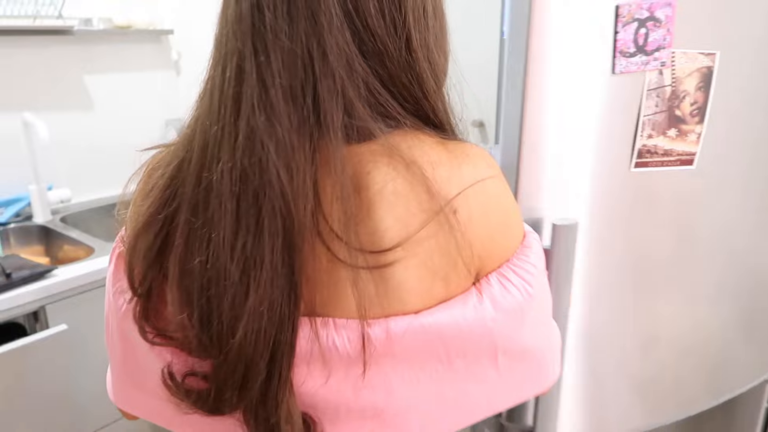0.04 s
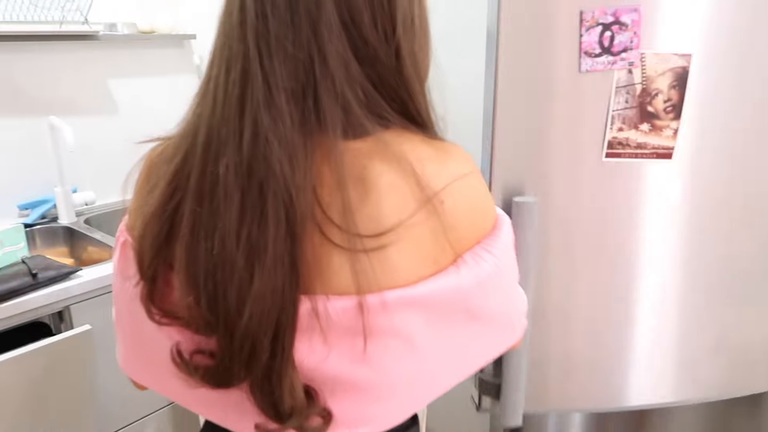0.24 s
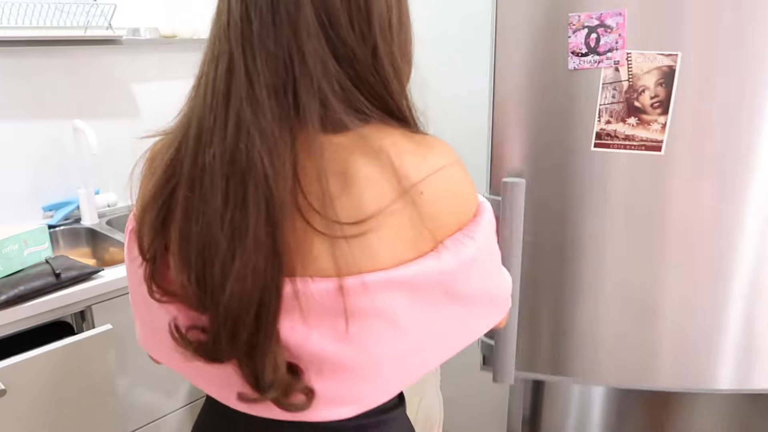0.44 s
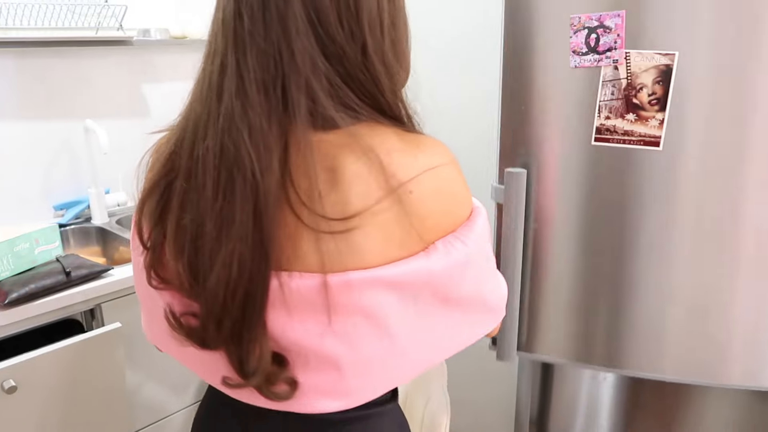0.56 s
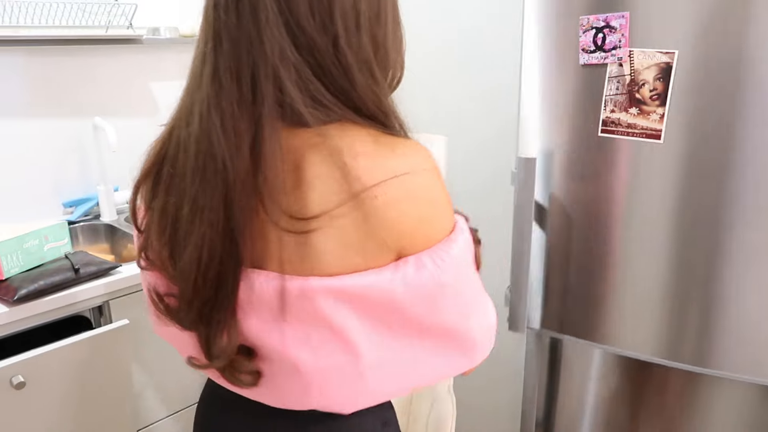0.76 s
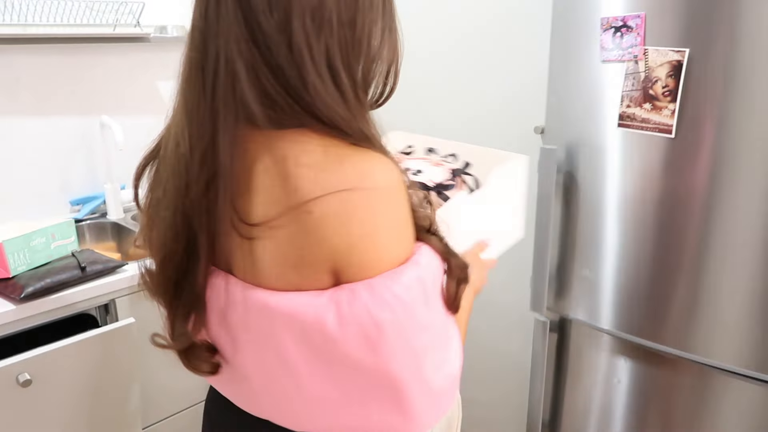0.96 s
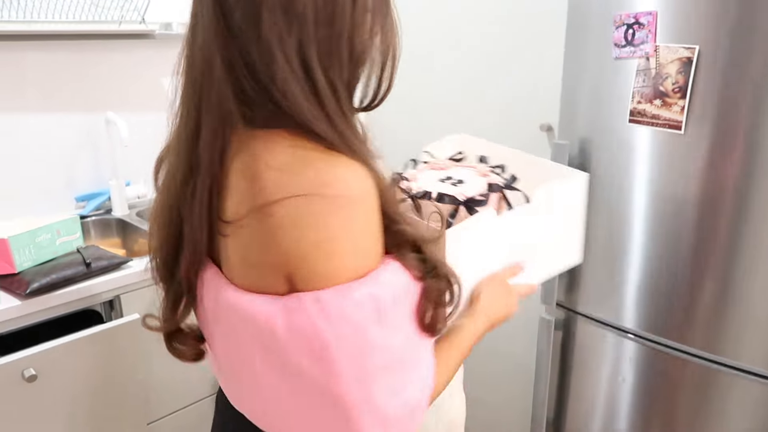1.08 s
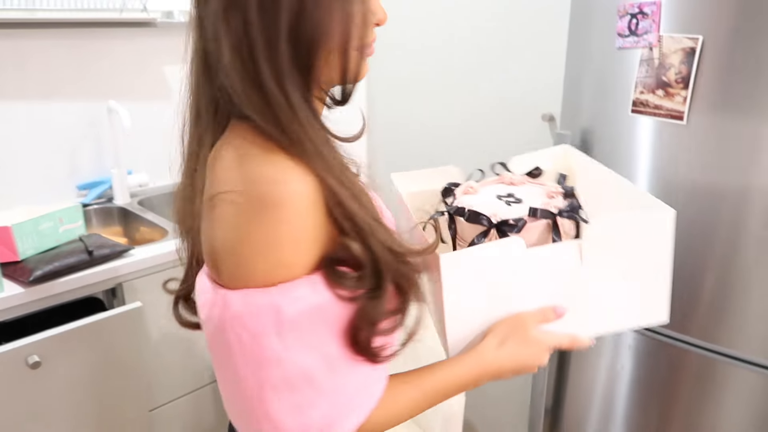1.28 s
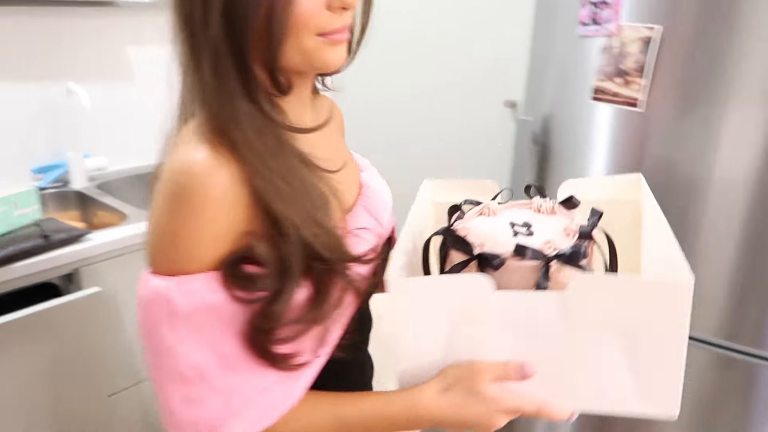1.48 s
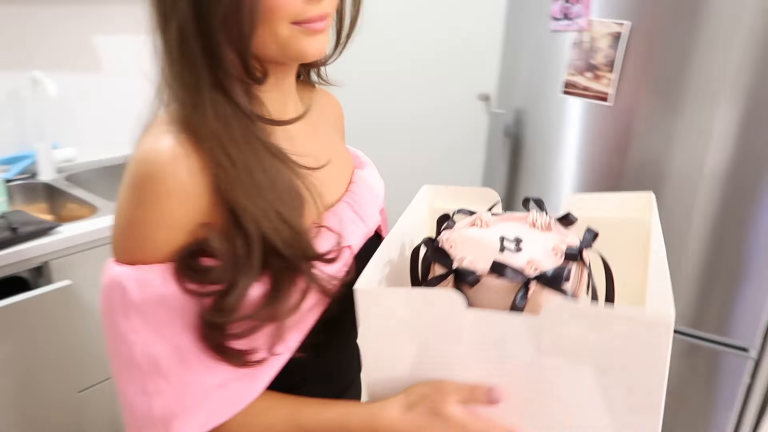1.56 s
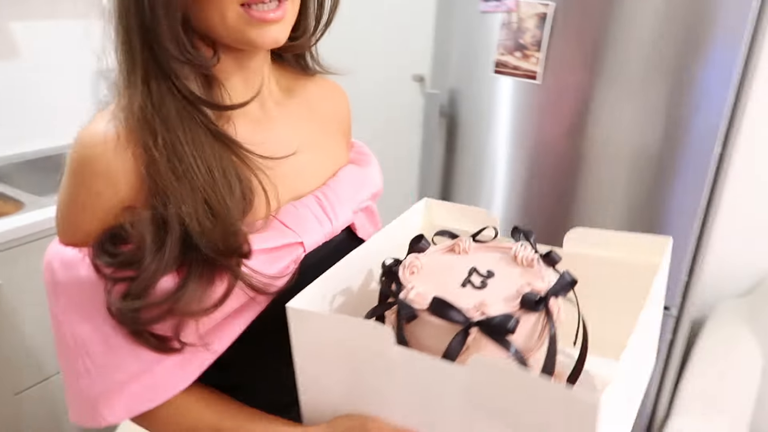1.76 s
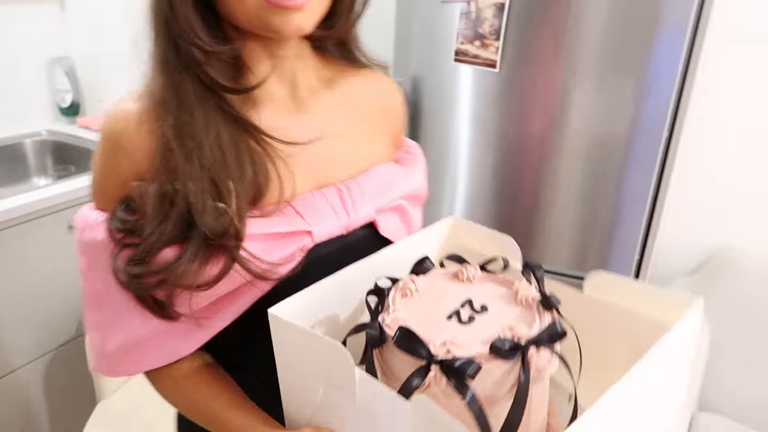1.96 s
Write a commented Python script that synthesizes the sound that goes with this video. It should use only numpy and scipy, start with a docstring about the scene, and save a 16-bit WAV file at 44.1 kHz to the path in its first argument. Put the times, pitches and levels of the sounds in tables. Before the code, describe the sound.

One solid thud of a fridge door closing in a small kitchen, over a low hum.

```python
"""A refrigerator door swings shut in a small hard-walled kitchen.
Over mains hum and faint room noise, clothes rustle. A short brush and a dull push of air
lead in, and the rubber seal scuffs the frame. Then one thud excites the cabinet's low modes
and the door's high ones; shelves clack, the room rings, and the cabinet rocks to rest.
Last, clothes and a cardboard box rustle and tick as someone turns away."""
import sys
import numpy as np
from scipy import signal
from scipy.io import wavfile

SR = 44100
rng = np.random.default_rng(int(sys.argv[2]) if len(sys.argv) > 2 else 0)


def wrap_up_sound(samples):
    """Save the sound to the file named by the first command line argument, as 16-bit audio."""
    columns = np.atleast_2d(samples).T
    # keep every value between -1 and 1, then stretch to whole-number steps
    tamed = np.clip(columns, -1, 1)
    steps = np.round(tamed * 32767).astype(np.int16)
    wavfile.write(sys.argv[1], SR, steps)


N = 89302
T = np.arange(N) / SR
THUD_S, HUM_HZ = 1.1342, 99.9

# left-right coherence of distinct events: frequency_hz, correlation
EVENT_COHERENCE = [(100, 1), (500, 1), (1500, 0.94), (3100, 0.81), (6500, 0.14), (9000, -0.36),
                   (13000, -0.68)]
# left-right coherence of room noise and rustling: frequency_hz, correlation
ROOM_COHERENCE = [(60, 0.94), (130, 0.8), (290, -0.059), (640, 0.17), (1400, 0.48), (3100, 0.46),
                  (6800, 0.25), (13000, -0.22)]


def from_db(db):
    """Amplitude grows tenfold for every 20 dB."""
    return 10 ** (np.asarray(db) / 20)


def at_hz(table, hz, column=1):
    """Interpolation of a table column on a logarithmic frequency axis."""
    rows = np.array(table)
    return np.interp(np.log(hz), np.log(rows[:, 0]), rows[:, column])


def butterworth(x, order, hz, kind):
    """A filter with a maximally flat passband."""
    return signal.sosfilt(signal.butter(order, hz, kind, fs=SR, output="sos"), x)


def tone(hz, db):
    """Simple harmonic motion at a given rms level."""
    return np.sqrt(2) * from_db(db) * np.sin(2 * np.pi * hz * T)


def click(start_s):
    """A unit impulse, which excites all frequencies equally."""
    return 1.0 * (np.arange(N) == int(start_s * SR))


def ring(force, hz, t60):
    """A damped oscillator: its impulse response is a decaying sine of height 1."""
    decay = from_db(-60 / (t60 * SR))
    step = 2 * np.pi * hz / SR
    return signal.lfilter([0, np.sin(step)], [1, -2 * decay * np.cos(step), decay ** 2], force + 1e-18)


def swell(peak_s, rise_s, t60):
    """A smooth rise to a peak, then exponential decay by 60 dB in t60 seconds."""
    rise = np.sin(np.pi / 2 * np.clip((T - peak_s) / rise_s + 1, 0, 1)) ** 2
    return rise * from_db(-60 * np.maximum(T - peak_s, 0) / t60)


def swells(events):
    """Superposition of swells into one envelope."""
    return sum(from_db(db) * swell(peak_s, rise_s, t60) for peak_s, db, rise_s, t60 in events)


def noise(spectrum, coherence, envelope=lambda hz: 1):
    """Partly coherent stereo noise in half-octave bands, of total rms 1 before the envelope."""
    edges = 22 * 2 ** np.arange(0, 9.6, .5)
    run_in = SR // 4
    white = rng.standard_normal((2, 2, N + run_in))
    out, power = 0, 0
    for k, (low, high) in enumerate(zip(edges, edges[1:])):
        mid, side = butterworth(white[k % 2], 3, [low, high], "band")[:, run_in:]
        hz = np.sqrt(low * high)
        correlation = np.clip(at_hz(coherence, hz), -1, 1)
        stereo = np.sqrt(1 + correlation) * mid + np.sqrt(1 - correlation) * side * [[1], [-1]]
        gain = from_db(at_hz(spectrum, hz))
        out = out + gain * envelope(hz) * stereo
        power += gain ** 2 * 2 * (high - low) / (SR / 2)
    return out / np.sqrt(power)


def background():
    """Line spectrum over a continuum: wavering mains hum and an electrical whine over room noise."""
    # still air of the room: frequency_hz, relative_density_db
    air_spectrum = [(25, -4), (70, 1), (130, 1.5), (370, -0.5), (700, -8), (1300, -9), (2500, -16),
                    (5400, -25.5), (9000, -28.5), (12500, -38.5), (15000, -36)]
    waver_db = 1.1 * np.interp(T, np.linspace(0, T[-1], 16), rng.standard_normal(16))
    hum = tone(HUM_HZ, db=-51.5 + waver_db)
    whine = tone(hz=13001, db=-89)
    return hum + whine + from_db(-52) * noise(air_spectrum, ROOM_COHERENCE)


def rustle():
    """Friction noise: clothes hiss, a shuffle drives the box's resonance, a sleeve swishes once."""
    # loudness of the cloth and of the shuffle of body and box: time_s, level_db
    hiss_levels = [(0, -60), (.33, -60), (.5, -65.5), (.67, -64.5), (.9, -61), (1.2, -72), (1.6, -64.5),
                   (1.8, -63), (1.93, -64), (2.0, -56.5)]
    shuffle_levels = [(0, -64), (.2, -58), (.26, -53), (.33, -58.5), (.39, -52.5), (.45, -60.5), (.5, -65),
                      (.6, -66), (.67, -66), (.76, -76), (.85, -75)]
    # spectra of cloth, shuffle and sleeve: frequency_hz, relative_density_db
    hiss_spectrum = [(150, -27), (1500, 0), (4000, 3.5), (7000, -3.5), (12000, -8), (15000, -7)]
    shuffle_spectrum = [(60, -22), (170, -12.5), (390, -1), (600, 2.5), (1000, -9), (2000, -19),
                        (5000, -49)]
    swish_spectrum = [(300, -17), (900, -2), (1400, 2.5), (2300, 3), (4200, -4), (5800, -3), (8000, -20),
                      (12500, -19), (15000, -35)]
    hiss = from_db(np.interp(T, *np.transpose(hiss_levels))) * noise(hiss_spectrum, ROOM_COHERENCE)
    rub = noise(shuffle_spectrum, ROOM_COHERENCE)
    hollow = ring(rub, hz=386, t60=0.097)
    shuffle = rub + from_db(-4) * hollow / hollow.std()
    shuffle *= from_db(np.interp(T, *np.transpose(shuffle_levels)))
    sleeve = from_db(-50.5) * swell(peak_s=0.12, rise_s=0.045, t60=0.36)
    return hiss + shuffle + sleeve * noise(swish_spectrum, ROOM_COHERENCE)


def clatter():
    """Impact excitation: each contact rings one damped mode; yielding plastic softens the treble."""
    # dull bumps of the seal, the door's load and the box: start_s, level_db, pitch_hz, t60_s
    bumps = [(.065, -42.5, 650, 0.029), (0.439, -44.5, 400, 0.14), (.963, -37, 240, 0.12),
             (0.969, -38.5, 400, 0.13), (1.032, -30.5, 308, 0.071), (1.051, -35, 1043, 0.049),
             (1.117, -25, 257, 0.021), (1.1361, -14.5, 326, 0.027), (1.1533, -16, 190, 0.025),
             (1.167, -15, 181, 0.027), (1.223, -26, 175, 0.083), (1.668, -42.5, 483, 0.054),
             (1.677, -40.5, 696, 0.046)]
    # hard contacts of frame and shelves: start_s, level_db, pitch_hz, t60_s
    clacks = [(0.9636, -32, 1520, 0.0086), (0.9684, -29.5, 1720, 0.012), (1.0637, -30, 1030, 0.014),
              (1.134, -9, 1610, 0.016), (1.1372, -27, 2230, 0.0043), (1.1421, -9, 3150, 0.01),
              (1.1476, -12, 1700, 0.017), (1.1507, -9, 2120, 0.0065), (1.166, -18, 2900, 0.0097)]
    rings = sum(from_db(db) * ring(click(start_s), hz, t60) for start_s, db, hz, t60 in bumps + clacks)
    return butterworth(rings, order=2, hz=8000, kind="low")


def brushes_and_puffs():
    """Stick-slip friction makes bright, grainy brushes; pushed air and soft steps make dull puffs."""
    # brushes of door, clothes and box, and puffs of air and steps: peak_s, level_db, rise_s, t60_s
    brush_events = [(.37, -56, 0.11, 0.27), (.68, -59.5, 0.1, 0.81), (.981, -35, 0.016, 0.16),
                    (1.565, -74, .015, 0.15), (1.695, -51.5, 0.042, 0.24), (2.0, -70, 0.079, 0.15)]
    puff_events = [(.44, -50, 0.012, 0.089), (.89, -49.5, 0.03, 0.18), (.968, -45, 0.022, 0.67),
                   (1.036, -40.5, 0.025, 0.61), (1.122, -35, 0.0015, 0.32), (1.68, -53, 0.047, 0.26),
                   (1.92, -53.5, 0.07, 0.21)]
    # their spectra: frequency_hz, relative_density_db
    brush_spectrum = [(120, -5), (300, -6), (700, -4), (1200, 1.5), (1900, 3), (3600, -2), (6500, -12.5),
                      (10000, -17), (15000, -25)]
    puff_spectrum = [(40, 0), (130, -18), (240, 8), (360, 2.5), (600, -7.5), (1200, -11), (2400, -17),
                     (5000, -33.5), (12000, -43)]
    grains_per_s, grain_db = 830, 0.5
    brushes = swells(brush_events) * noise(brush_spectrum, EVENT_COHERENCE)
    puffs = swells(puff_events) * noise(puff_spectrum, EVENT_COHERENCE)
    grain = from_db(grain_db * np.interp(T * grains_per_s, np.arange(N), rng.standard_normal(N)))
    return grain * brushes + puffs


def seal():
    """Forced vibration: friction drives the hollow seal, and the cabinet drones as it presses in."""
    # resonances of the rubber seal: pitch_hz, level_db, t60_s
    modes = [(778, -44, 0.099), (1050, -42.5, 0.059), (1846, -49, 0.042)]
    # scuffs against the frame: peak_s, gain_db, rise_s, t60_s
    scuffs = [(.905, -15.5, 0.021, 0.19), (1.051, 0, 0.026, 0.15)]
    # friction noise of the rubber: frequency_hz, relative_density_db
    friction_spectrum = [(200, -8), (600, -6), (1020, 8), (1350, -13), (1800, -3), (3000, -26), (8000, -45)]
    rub = rng.standard_normal(N)
    hollow = 0
    for hz, db, t60 in modes:
        mode = ring(rub, hz, t60)
        hollow = hollow + from_db(db) * mode / mode.std()
    friction = from_db(-41) * noise(friction_spectrum, EVENT_COHERENCE)
    drone = swell(peak_s=1.02, rise_s=0.08, t60=0.17) * tone(HUM_HZ, db=-47)
    return swells(scuffs) * (hollow + friction) + drone


def thud():
    """Modal response: one pressure pulse leaves the cabinet booming and the door ringing."""
    # modes of cabinet and side panels, and of door skin and shelves: pitch_hz, level_db, t60_s
    cabinet_modes = [(32, -23.5, .55), (104, -29.5, .35), (142, -32.5, .42), (172.7, -23.5, .46),
                     (228.5, -30, .45), (266, -33, .4), (291, -30, .35), (356.5, -30, .48), (398, -33, .38),
                     (470, -35, .38), (501, -30, .16), (537, -30, .31), (725, -32, .25)]
    door_modes = [(1100, -37, .28), (1199, -35, .38), (1292, -33, .25), (1444, -27, .28), (1507, -34, .33),
                  (1595, -22, .2), (1691, -29, .25), (1829, -22, .24), (1994, -32, .26), (2067, -33, .28),
                  (2139, -27, .26), (2216, -31, .2), (2768, -33, .2), (3116, -34, .18), (3378, -33, .24)]
    contact_s = 0.002539
    pulse = -from_db(-6.5) * np.sin(np.pi * np.clip((T - THUD_S) / contact_s, 0, 1))
    push = butterworth(pulse, order=1, hz=87, kind="high")
    strike = click(THUD_S + contact_s)
    # successive modes start in opposite phase
    return push + sum((-1) ** k * from_db(db) * ring(strike, hz, t60)
                      for k, (hz, db, t60) in enumerate(cabinet_modes + door_modes))


def reverberation():
    """Modal overlap: with a brief crunch, cabinet and kitchen ring as noise, the bass lasting longest."""
    # crunch of the contact: frequency_hz, relative_density_db
    crunch_spectrum = [(100, 0), (300, 6.5), (900, 0), (1700, -1), (3300, 2.5), (5000, -27), (8500, -12),
                       (12000, -33), (15500, -38)]
    # dense modes of cabinet and kitchen: frequency_hz, relative_density_db, t60_s
    tail_bands = [(40, -9, 1), (80.5, -11, 0.6), (125, -7.5, 0.56), (190, -4, 0.55), (400, -3.5, 0.47),
                  (650, -6.5, 0.3), (830, -7.5, 0.38), (1700, -5.5, 0.44), (3210, -9.5, 0.36),
                  (4840, -29, 0.37), (8400, -21.5, 0.21), (14800, -65, 0.068)]
    crunch_rise_s, tail_rise_s = 0.011, 0.0018
    crunch = noise(crunch_spectrum, EVENT_COHERENCE)
    crunch *= swell(THUD_S + crunch_rise_s, crunch_rise_s, t60=0.082)
    tail = noise(tail_bands, EVENT_COHERENCE,
                 lambda hz: swell(THUD_S + tail_rise_s, tail_rise_s, at_hz(tail_bands, hz, column=2)))
    return from_db(-20.5) * (crunch + tail)


def cracks():
    """Brief transients have wide spectra: plastic cracks in bright bursts as the door seats."""
    # cracks of the plastic: peak_s, level_db, centre_hz, t60_s
    events = [(1.1348, -31.5, 6400, 0.0052), (1.1382, -32, 9000, 0.0034), (1.1410, -29, 7500, 0.0035),
              (1.1439, -22, 4700, .009)]
    width_octaves = 0.86
    out = 0
    for peak_s, db, hz, t60 in events:
        edges = hz * 2 ** (width_octaves * np.array([-.5, .5]))
        burst = butterworth(rng.standard_normal((2, N)), 2, edges, "band")
        out = out + from_db(db) * swell(peak_s, rise_s=0.00028, t60=t60) * burst / burst.std()
    return out


def rocking():
    """Damped rocking: the cabinet's load knocks ever more weakly, so the dying bass flutters."""
    # knocks of the load: peak_s, level_db, rise_s, t60_s
    knocks = [(1.187, -25.5, .008, 0.064), (1.229, -26.5, 0.0083, 0.037), (1.287, -36, 0.013, 0.12),
              (1.336, -42.5, 0.0073, 0.086), (1.378, -47, 0.0095, 0.09)]
    # their dull spectrum: frequency_hz, relative_density_db
    knock_spectrum = [(30, -3), (70, -16), (170, 6.5), (300, 0), (450, -8), (800, -28), (2000, -37),
                      (8000, -63)]
    return swells(knocks) * noise(knock_spectrum, EVENT_COHERENCE)


def box_ticks():
    """Heavily damped transients: the box gives two thin ticks of very high band-limited noise."""
    # ticks of the cardboard: peak_s, level_db
    ticks = [(1.7955, -47), (1.85, -55)]
    centre_hz, width_hz = 11400, 3100
    edges = [centre_hz - width_hz / 2, centre_hz + width_hz / 2]
    fizz = butterworth(rng.standard_normal((2, N)), 2, edges, "band")
    envelope = sum(from_db(db) * swell(peak_s, rise_s=0.00076, t60=0.0088) for peak_s, db in ticks)
    return envelope * fizz / fizz.std()


def scene():
    """Linear superposition: the door straight ahead, the kitchen all round."""
    approach = background() + rustle() + clatter() + brushes_and_puffs() + seal()
    return approach + thud() + reverberation() + cracks() + rocking() + box_ticks()


def record(dry):
    """Band limiting: a steep low-pass filter is 70 dB down at 16.3 kHz."""
    return signal.sosfilt(signal.cheby2(12, 70, 16300, fs=SR, output="sos"), dry)


dry = scene()
out = record(dry)
wrap_up_sound(out)
```